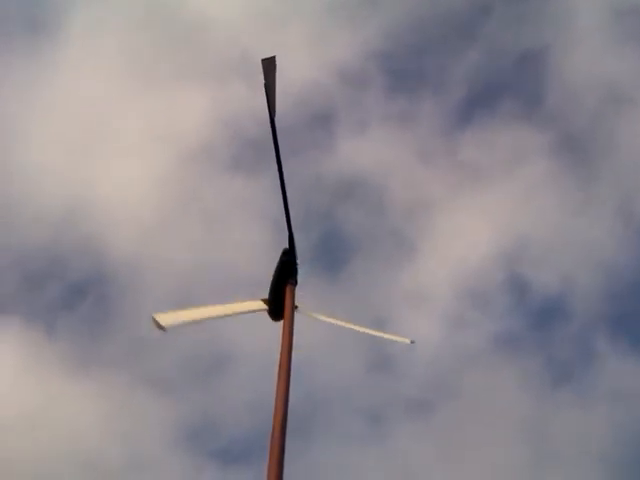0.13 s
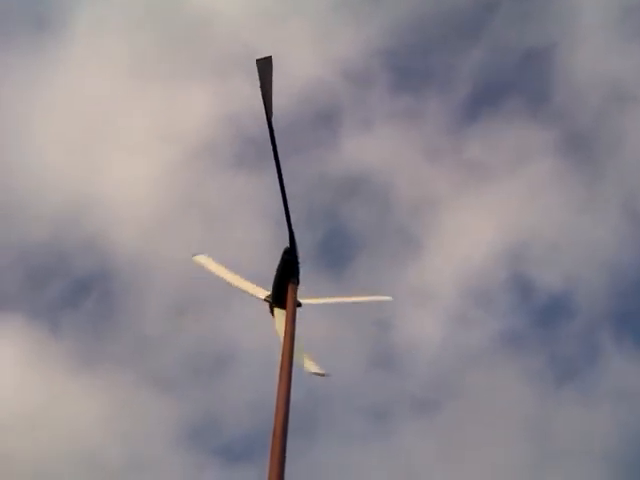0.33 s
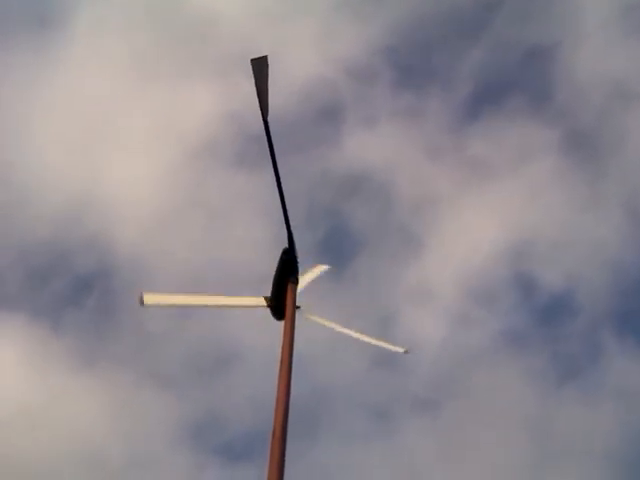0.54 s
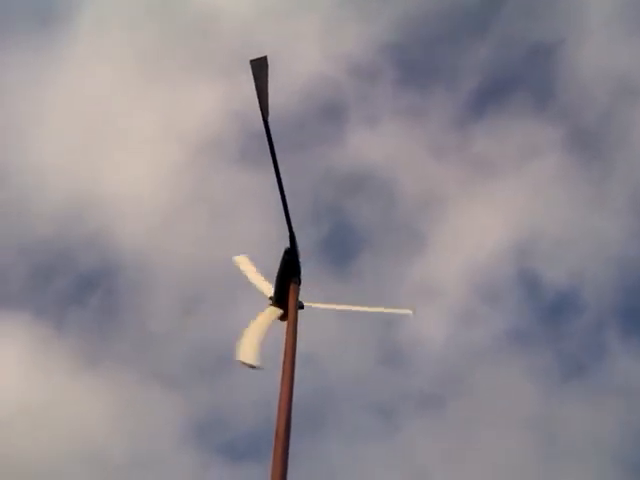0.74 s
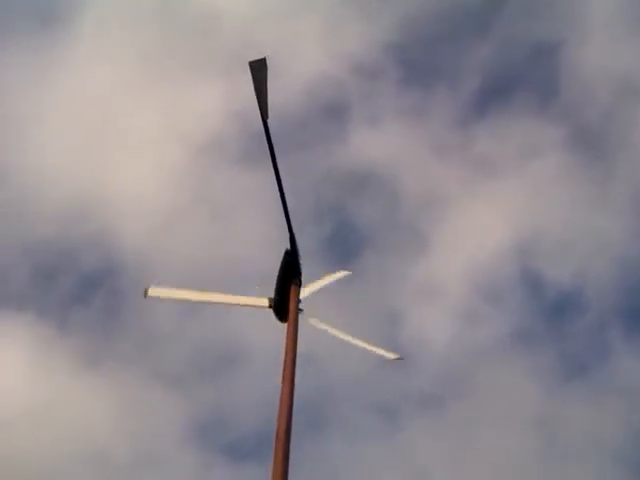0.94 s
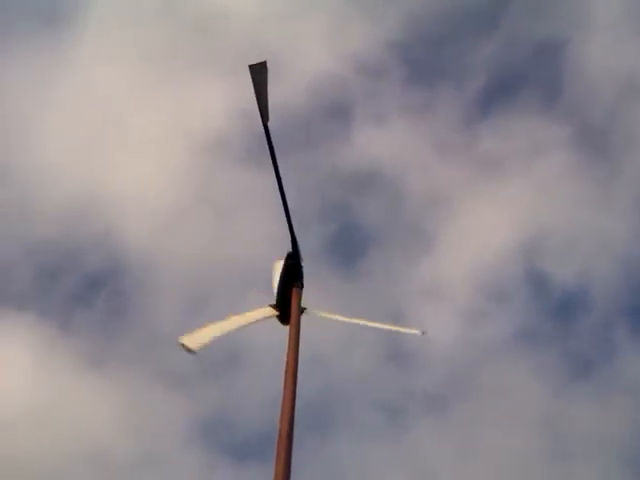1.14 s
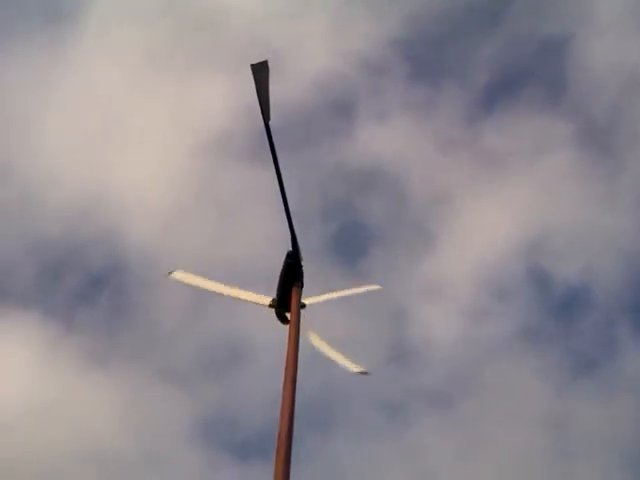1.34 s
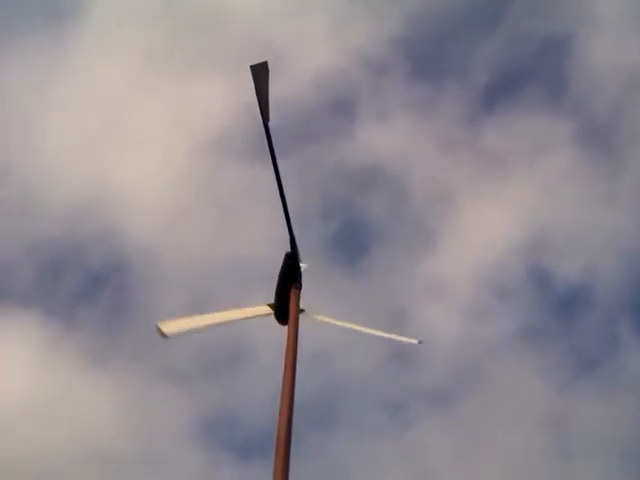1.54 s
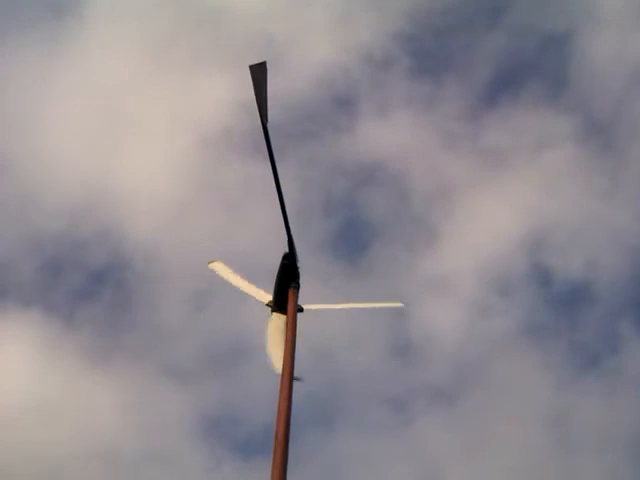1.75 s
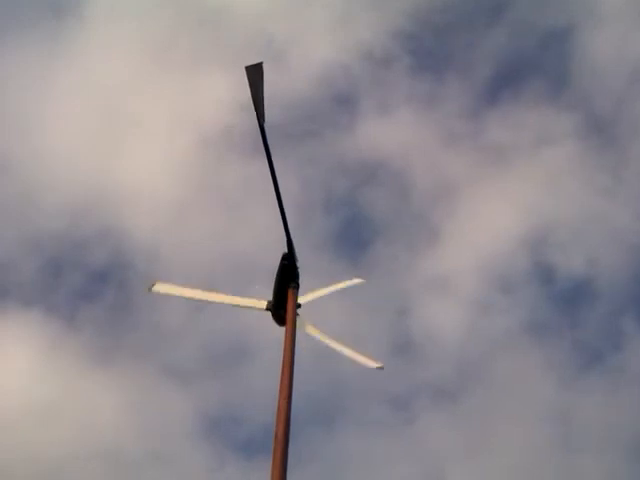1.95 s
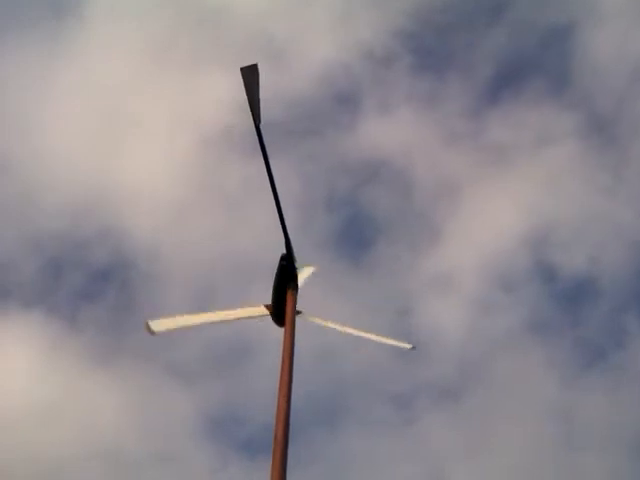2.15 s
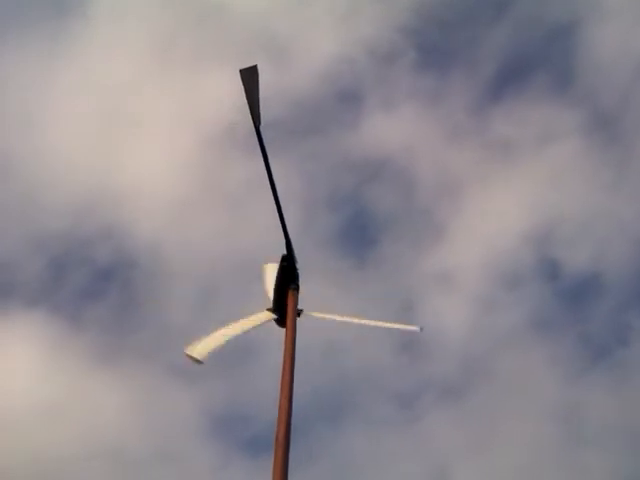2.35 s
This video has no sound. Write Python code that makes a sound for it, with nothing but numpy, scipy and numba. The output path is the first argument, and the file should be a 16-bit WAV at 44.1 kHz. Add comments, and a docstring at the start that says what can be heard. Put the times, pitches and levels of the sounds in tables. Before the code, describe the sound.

Steady airy whir of a small spinning wind turbine outdoors, broken by low ragged wind thumps

```python
"""A small three-blade wind turbine whirs on its pole above a camera microphone, slowing slightly.
From the start its blades swish, treble first, over a steady rush of air: banded noise swinging per blade.
Eddies dragged by gusts over the bare port suck at the capsule: a low, ragged rumble made of pressure puffs.
It is slight at first, swells with hard thumps from about 0.2 s, is thickest from 0.6 to 1.1 s,
then breaks into scattered bursts and fades towards the end."""
import sys
import numpy as np
from scipy import signal
from scipy.fft import rfft, irfft
from scipy.io import wavfile
from scipy.ndimage import uniform_filter1d
from numba import njit

SR = 44100
rng = np.random.default_rng(int(sys.argv[2]) if len(sys.argv) > 2 else 0)


def digitize_waveform(pressure):
    """Quantize a signal to 16-bit integers and store it at the path in sys.argv[1].

    Rows of a 2-D input are taken as channels; values are limited to [-1, 1].
    """
    field = np.atleast_2d(pressure).T
    bounded = np.clip(field, -1, 1)
    quanta = np.round(bounded * 32767).astype(np.int16)
    wavfile.write(sys.argv[1], SR, quanta)


N = 110250

# Rotor speed. Each row: time in seconds, blade passes per second.
BLADE_RATE = [(0, 27.3), (.5, 26.5), (1.95, 26.5), (2.2, 25.2), (2.5, 25.2)]
# Spectrum of the rush. Each row: frequency in Hz, relative density in dB per Hz.
RUSH_SPECTRUM = [(30, 0.5), (60, 5), (90, 6.5), (140, -7.5), (270, -17), (370, -7), (600, -4), (1000, -4),
                 (1500, -4), (2200, -5.5), (2950, -10), (3700, -4), (4500, -3.5), (5700, -5), (6800, -22.5),
                 (8000, -16.5), (9500, -32), (13000, -36), (15500, -47)]
# Rush level. Each row: time in seconds, RMS of its 1.2-6.5 kHz part in dB before swish and flicker.
RUSH_LEVEL = [(0.0, -34), (0.4, -33.5), (0.6, -36.5), (1.05, -34.5), (1.58, -34), (1.92, -35), (2.5, -35.5)]
# Blade swish. Each row: band centre in Hz, swing either side of the mean level in dB.
SWISH_SWING = [(700, -0.1), (1200, 1.0), (2200, 0.06), (4200, 2.5), (8000, 1.6)]
# Gusts at the port. Each row: time in seconds, buffet level in dB, typical eddy length in ms.
GUST = [(0.0, -36, 2.4), (0.05, -50, 2.4), (0.205, -50, 2.41), (0.234, -26.5, 1.62), (0.259, -39, 2.05),
        (0.284, -48, 2.25), (0.294, -29, 2.3), (0.304, -45, 2.95), (0.344, -18, 1.57), (0.364, -19.5, 1.28),
        (0.379, -28, 1.7), (0.429, -20.5, 2.12), (0.449, -31.5, 1.75), (0.544, -31.5, 2.36),
        (0.564, -22.5, 2.33), (0.584, -14.5, 1.56), (0.604, -19, 1.56), (0.614, -23.5, 1.85),
        (0.663, -14, 1.65), (0.683, -26.5, 1.69), (0.693, -17.5, 1.37), (0.743, -29.5, 2.28),
        (0.758, -16.5, 1.39), (0.788, -30, 1.94), (0.808, -31, 2.38), (0.863, -17.5, 1.3),
        (0.888, -15.5, 1.57), (0.903, -27, 1.42), (0.923, -17.5, 1.22), (0.993, -15.5, 1.3),
        (1.008, -20.5, 1.147), (1.028, -15, 1.26), (1.068, -21, 1.58), (1.127, -23, 2.76),
        (1.152, -23, 1.37), (1.192, -28.5, 2.57), (1.202, -29, 1.33), (1.227, -41, 2.29),
        (1.257, -36, 1.98), (1.272, -41, 2.12), (1.352, -49, 1.79), (1.387, -36.5, 2.15), (1.417, -30, 2.5),
        (1.427, -49, 1.26), (1.447, -29, 2.97), (1.507, -39.5, 2.02), (1.522, -39, 2), (1.546, -27.5, 2),
        (1.59, -22, 1.66), (1.616, -15.5, 1.74), (1.636, -30, 1.7), (1.671, -47, 1.9), (1.686, -25, 1.57),
        (1.721, -28.5, 1.59), (1.741, -44, 1.82), (1.776, -46, 2.09), (1.786, -30, 1.85),
        (1.796, -50, 2.37), (1.816, -29, 2.2), (1.83, -36, 2.23), (1.851, -22, 2.06), (1.878, -27, 1.61),
        (1.892, -41, 2.43), (1.95, -47, 2.31), (2.005, -42.5, 3.2), (2.025, -21, 1.17), (2.04, -31, 2.58),
        (2.055, -30, 1.92), (2.08, -32, 1.73), (2.1, -38, 2.3), (2.12, -43, 1.47), (2.135, -35, 1.61),
        (2.145, -38, 2.09), (2.155, -25, 2.6), (2.17, -43, 2.6), (2.225, -28.5, 2.87), (2.25, -45.5, 2.02),
        (2.499, -48.5, 1.82)]
# Hard sucking eddies. Each row: time in seconds, depth in dB ahead of the port, length in ms.
THUMPS = [(0.2339, -11, 1.63), (0.3514, -7.5, 1.04), (0.3627, -8, 1.35), (0.4225, -5.5, 1.94),
          (0.4425, -10, 1.64), (0.602, -14.5, 0.53), (0.635, -9, 2.3), (0.645, -5.5, 2.2),
          (0.6609, -17.5, 0.65), (0.6628, -7, 1.5), (0.6957, -5.5, 1.07), (0.8567, -15, 1.08),
          (0.9187, -10, 1.5), (0.9812, -10, 1.3), (0.996, -6, 0.86), (1.0079, -6.5, 0.95),
          (1.0211, -9, 1.02), (1.0435, -2, 1.2), (1.065, -7, 1.1), (1.1542, -14, 1.13), (1.2081, -10, 1.94),
          (1.4525, -17, 3), (1.6196, -5.5, 1.205), (1.7028, -13, 2.4), (1.8403, -15, 0.73),
          (1.85, -11, 1.37), (1.8642, -14, 3.3), (1.875, -16, 1.13), (2.0203, -10.5, 1.04),
          (2.035, -27, 0.72), (2.057, -16.5, 1.53), (2.0636, -11.5, 2.54), (2.132, -13, 2.45)]
# Hard pressing eddies. Each row: time in seconds, height in dB ahead of the port, length in ms.
PUSHES = [(0.9576, -6.5, 0.72), (1.0253, -7.5, 1.15), (1.6179, -5, 0.94)]

FIRST_PASS_TURNS = 0.16  # part of a blade cycle already done at the start
SWEEP_TURNS_PER_OCTAVE = .15  # one turn = one blade cycle
FLICKER_DB, FLICKER_PER_S = 0.93, 11.58
PORT_HZ, PORT_WIDTH_HZ = 64, 145
SIZE_SPREAD_DB, LENGTH_SPREAD_LOG = 2.5, 0.44
SUCTION_SHARE = .85
EDDY_SHOULDER = 0.58  # 0 plain dip, 1 dip balanced by a rise on either side
SIZE_LENGTH_POWER = 0.56  # shorter eddies are weaker
EDDIES_PER_LENGTH = .9  # shorter eddies follow each other faster
EVEN_SHARE, EVEN_S = 0.65, 0.0139  # share of the stream's own lumps smoothed, averaging time
CALM_S = 0.0023  # the stream gives way around a thump
THUMP_SHOULDER, THUMP_LEAD = 0.7, 0.3  # first shoulder stands higher than the last
TOP_HZ = 15600


def undb(db):
    """dB to amplitude."""
    return 10 ** (np.asarray(db) / 20)


def unit(x):
    """Scale to an RMS of 1."""
    return x / np.sqrt(np.mean(x ** 2))


def curve(table, column=1):
    """A table column joined by straight lines in time."""
    table = np.array(table, float)
    return np.interp(np.arange(N) / SR, table[:, 0], table[:, column])


def at_hz(table, hz):
    """Table values joined by straight lines in log frequency."""
    table = np.array(table, float)
    return np.interp(np.log(hz), np.log(table[:, 0]), table[:, 1])


def walk(rate_per_s):
    """Random levels, each held 1 / rate and slewed twice; spread near 1."""
    hold = int(SR / rate_per_s)
    steps = np.repeat(rng.standard_normal(N // 100), hold)[:N]
    return 1.5 * uniform_filter1d(uniform_filter1d(steps, hold), hold)


def rotor():
    """Half-octave bands of rush; each level swings once per blade, the high ones earlier."""
    turns = FIRST_PASS_TURNS + np.cumsum(curve(BLADE_RATE)) / SR
    hz = np.maximum(np.arange(N // 2 + 1) * SR / N, 1)
    spectrum = rfft(rng.standard_normal(N)) * undb(at_hz(RUSH_SPECTRUM, hz))
    reference = irfft(spectrum * (hz > 1200) * (hz < 6500), N)
    reference_rms = np.sqrt(np.mean(reference ** 2))
    rush = 0
    for centre_hz in 22 * 2 ** np.arange(0, 10, .5):
        away = np.clip(2 * np.log2(hz / centre_hz), -1, 1)
        band = irfft(spectrum * np.cos(np.pi * away / 2) ** 2, N)
        lead_turns = SWEEP_TURNS_PER_OCTAVE * np.log2(centre_hz / 4500)
        swish_db = at_hz(SWISH_SWING, centre_hz) * np.cos(2 * np.pi * (turns + lead_turns))
        flicker_db = FLICKER_DB * walk(FLICKER_PER_S)
        rush = rush + band * undb(swish_db + flicker_db)
    return rush / reference_rms * undb(curve(RUSH_LEVEL))


@njit
def puffs(start, length, size, shoulder, lead, count):
    """Bell-shaped pressure puffs with opposite shoulders; centre (start) and length in samples."""
    out = np.zeros(count)
    for k in range(len(start)):
        first = max(int(start[k] - 3 * length[k]), 0)
        last = min(int(start[k] + 3 * length[k]), count)
        for i in range(first, last):
            v = (i - start[k]) / length[k]
            shape = 1 - 4 * shoulder * v ** 2 + 2 * lead * v
            out[i] += size[k] * shape * np.exp(-2 * v ** 2)
    return out


def port(pressure):
    """The microphone bleeds off slow pressure: a second-order high-pass."""
    w = 2 * np.pi * PORT_HZ
    b, a = signal.bilinear([1, 0, 0], [1, 2 * np.pi * PORT_WIDTH_HZ, w ** 2], SR)
    return signal.lfilter(b, a, pressure)


def buffet():
    """A dense stream of eddies, mostly suction, uneven in size and length, following the gust."""
    gap_draw, sign_draw = rng.random((4000, 2)).T
    length_draw, size_draw = rng.standard_normal((4000, 2)).T
    typical = curve(GUST, column=2) / 1000 * SR
    # place eddies by a running count that rises faster where they are short
    eddy_count = np.cumsum(EDDIES_PER_LENGTH / typical)
    index = np.searchsorted(eddy_count, np.cumsum(.3 + 1.4 * gap_draw))
    stretch = np.exp(LENGTH_SPREAD_LOG * length_draw)
    length = typical[np.minimum(index, N - 1)] * stretch
    sign = np.where(sign_draw < SUCTION_SHARE, -1., 1.)
    size = sign * undb(SIZE_SPREAD_DB * size_draw) * stretch ** SIZE_LENGTH_POWER
    size = size * (index < N)  # drop eddies past the end
    stream = unit(port(puffs(1. * index, length, size, EDDY_SHOULDER, 0., N)))
    power = uniform_filter1d(stream ** 2, int(EVEN_S * SR))
    stream = stream / (power + .1) ** (EVEN_SHARE / 2)
    thump_s = np.array([*THUMPS, *PUSHES], float)[:, 0]
    calm = puffs(thump_s * SR, np.full(len(thump_s), CALM_S * SR), np.ones(len(thump_s)), 0., 0., N)
    return unit(stream) * undb(curve(GUST)) * np.clip(1 - calm, 0, 1)


def thumps():
    """The hardest single eddies, as lone puffs at the port: most suck, a few press."""
    s, db, ms = np.array([*THUMPS, *PUSHES], float).T
    sign = np.where(np.arange(len(s)) < len(THUMPS), -1., 1.)
    return port(puffs(s * SR, ms / 1000 * SR, sign * undb(db), THUMP_SHOULDER, THUMP_LEAD, N))


def scene():
    """Rotor, buffet and thumps add at one microphone."""
    return (rotor() + buffet() + thumps())[None]


def record(dry):
    """The recorder cuts the top with a steep elliptic low-pass."""
    return signal.sosfilt(signal.ellip(12, .2, 90, TOP_HZ, fs=SR, output="sos"), dry)


dry = scene()
out = record(dry)
digitize_waveform(out)
```